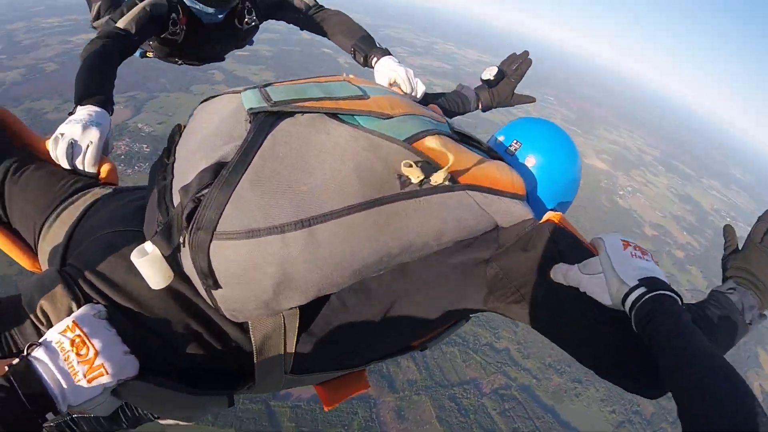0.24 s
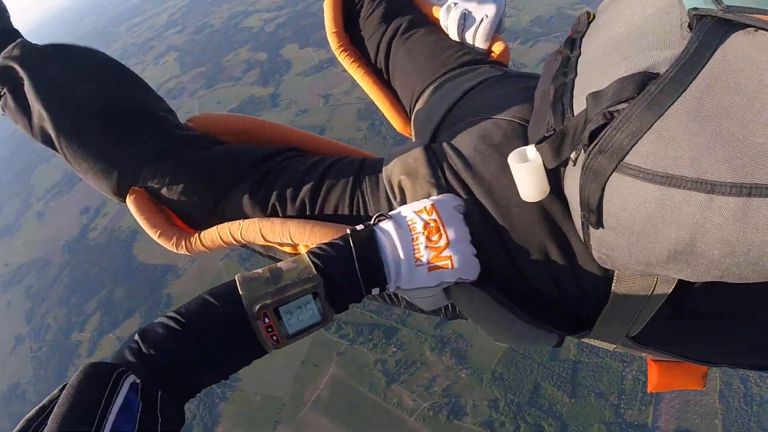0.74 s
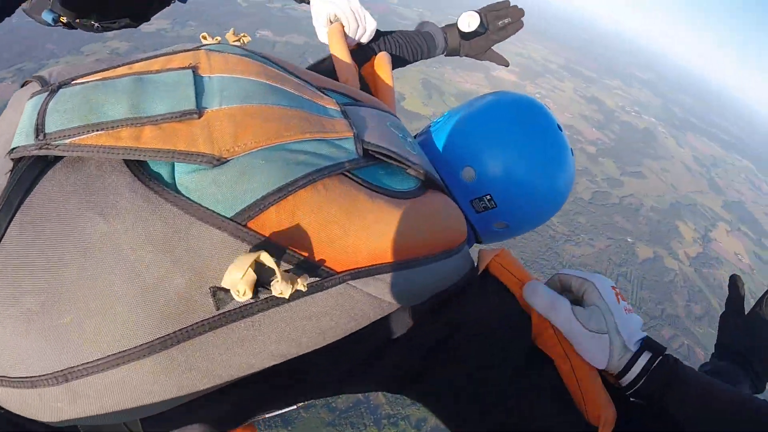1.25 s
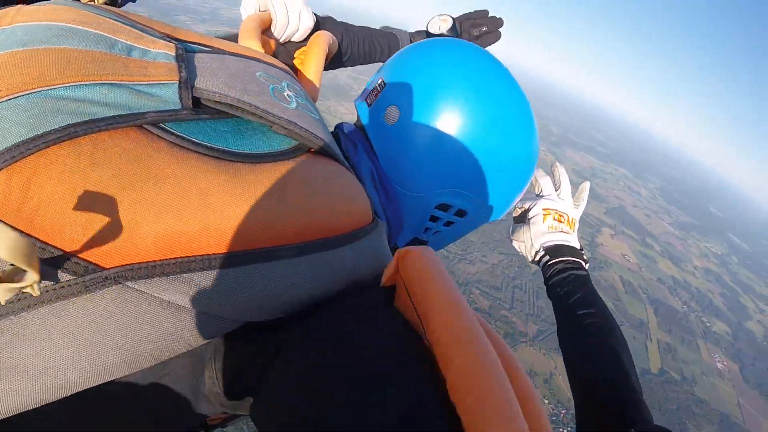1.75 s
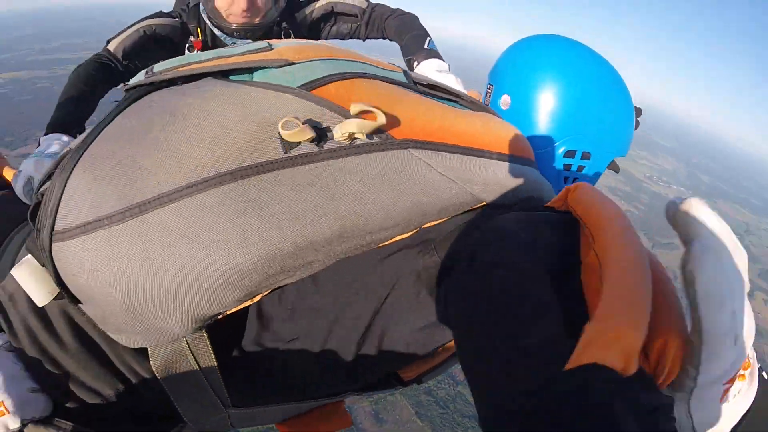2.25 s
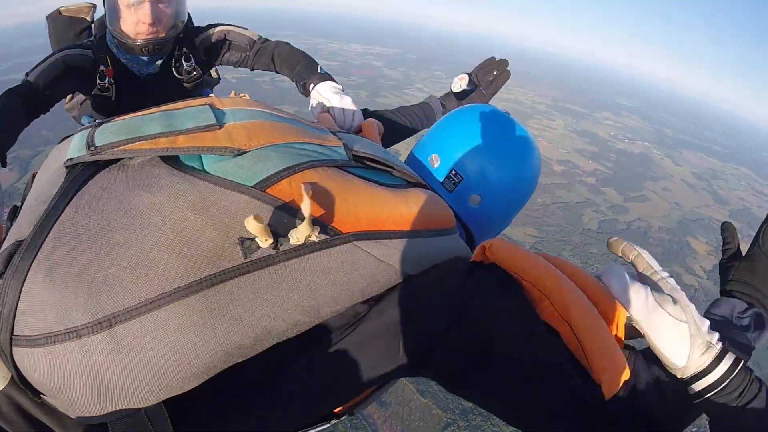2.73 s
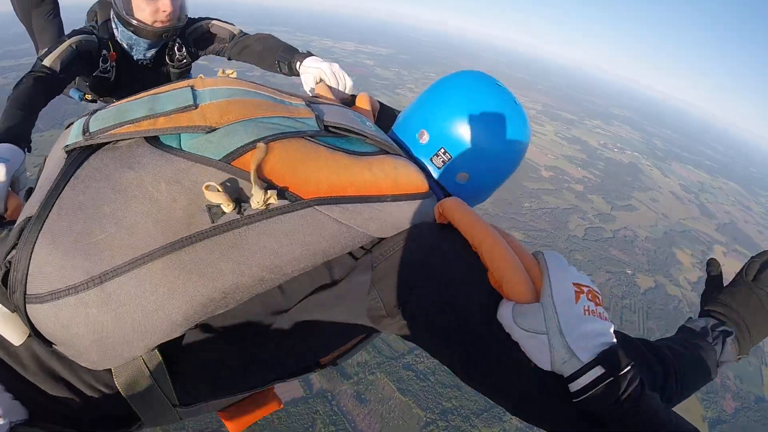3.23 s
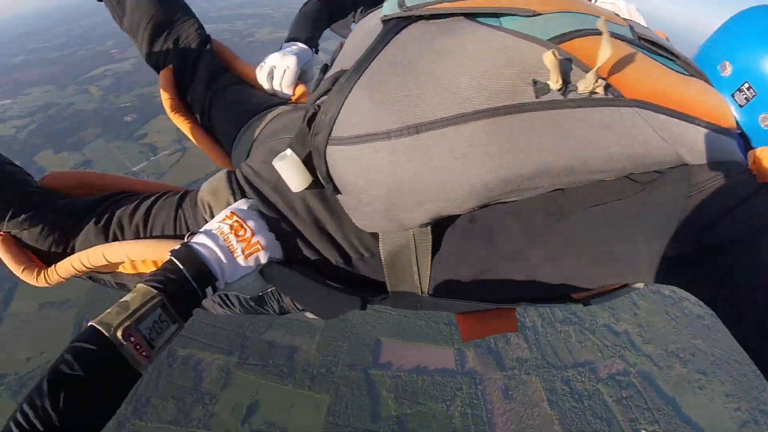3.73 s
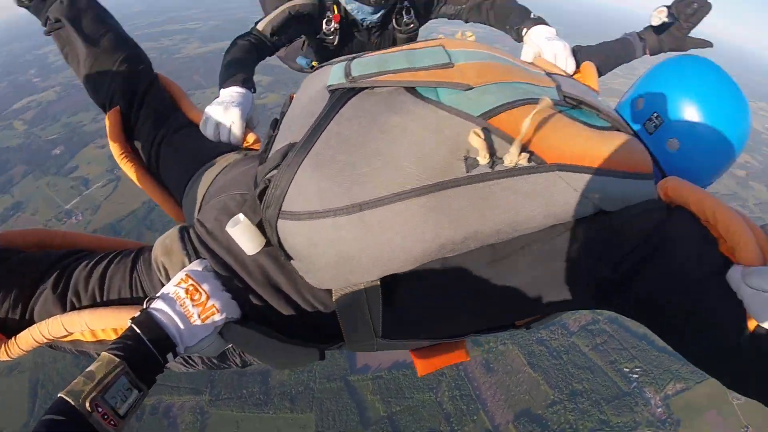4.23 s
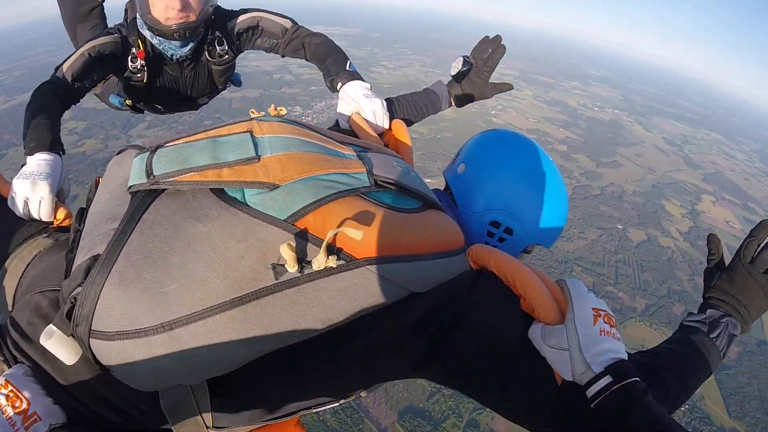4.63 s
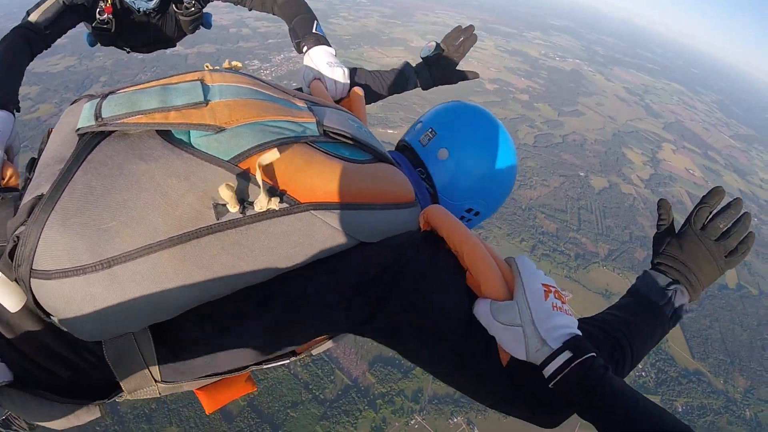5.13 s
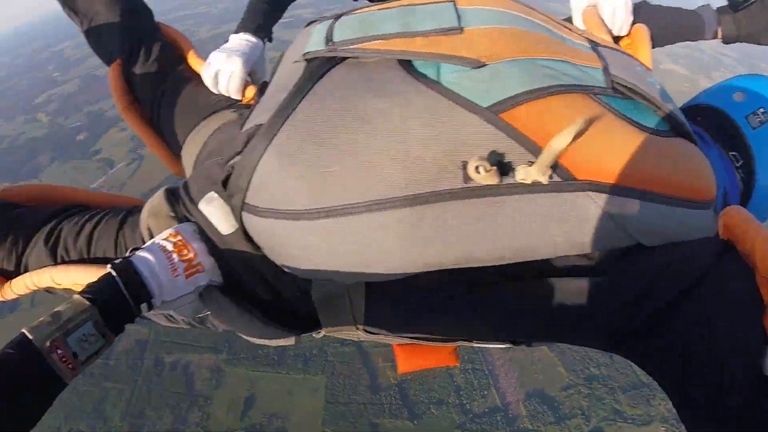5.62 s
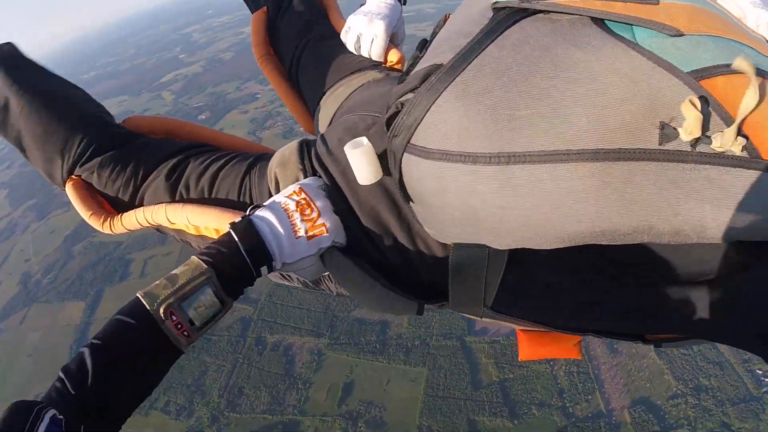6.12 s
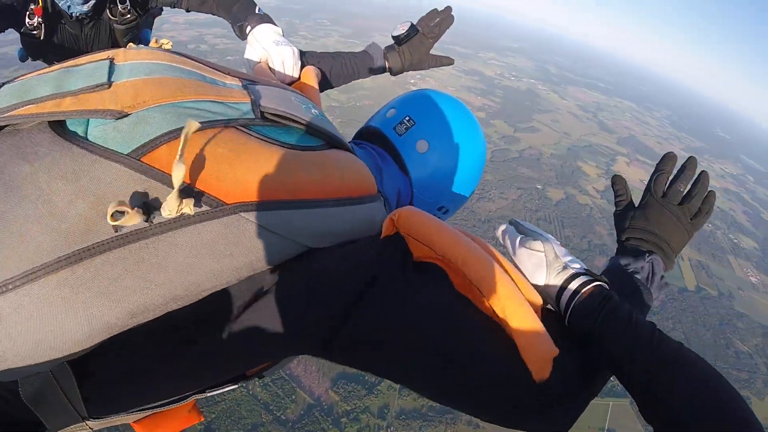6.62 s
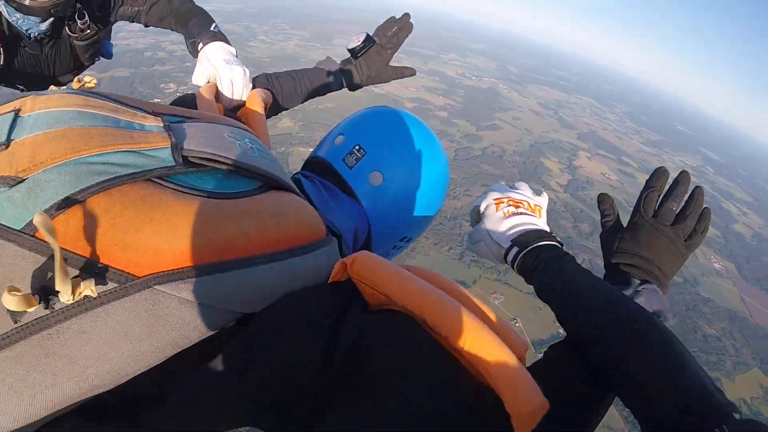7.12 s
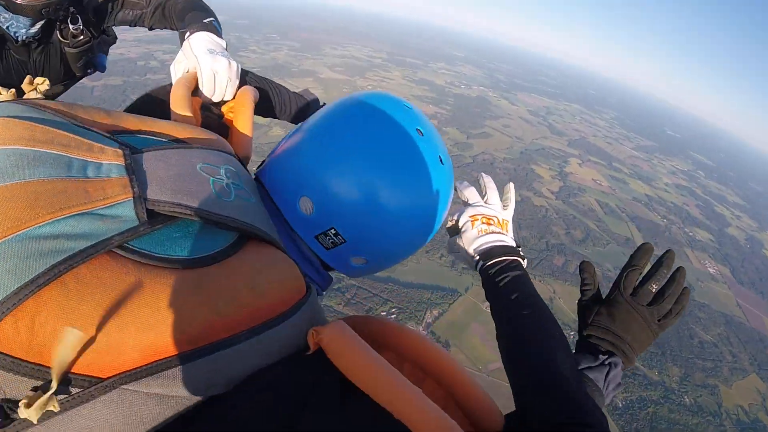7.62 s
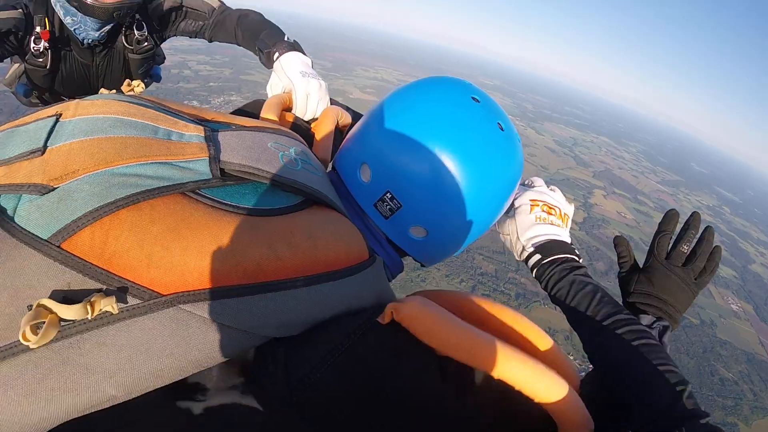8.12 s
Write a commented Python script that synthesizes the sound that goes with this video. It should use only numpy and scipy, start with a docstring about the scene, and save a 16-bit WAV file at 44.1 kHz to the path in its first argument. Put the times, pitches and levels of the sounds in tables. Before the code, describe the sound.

Skydivers in freefall, heard from a helmet camera whose microphone is overwhelmed by wind. A deep rumble and low throb run constantly under a ragged roar. The first second is brightest and harshest, with hissing bursts and hard slaps; then the hiss dulls and the air flutters, swelling brighter again around four and six seconds before ending darker and choppy. Very close, mono, squashed by limiting.

```python
"""A torn, buffeting wind roar with sharp slaps and a fluttering hiss: freefall, at a helmet camera's microphone port.
Large eddies buffet the housing and a wake sheds near 65 Hz: noise bands on slow level curves.
Small eddies roar and hiss in the port's cavity: higher bands that flutter together and follow head turns.
Bursts are short swells of noise, slaps are short damped tones; the camera's limiter holds the peaks down."""
import sys
import numpy as np
from scipy import signal
from scipy.fft import rfft, irfft, dct, next_fast_len
from scipy.io import wavfile
from scipy.ndimage import uniform_filter1d, minimum_filter1d, map_coordinates

SR = 44100
rng = np.random.default_rng(int(sys.argv[2]) if len(sys.argv) > 2 else 0)


def transcribe(signal):
    """Save signal, clipped to [-1, 1], as a 16-bit WAV file at the path in sys.argv[1]."""
    frames = np.atleast_2d(signal).T
    limited = np.clip(frames, -1, 1)
    pcm = np.round(limited * 32767).astype(np.int16)
    wavfile.write(sys.argv[1], SR, pcm)


N = 368676

# Levels in the tables are base levels: flutter, gulps and the recorder act on top.
# Flow at the port as the head turns. Each row: time in seconds, hiss, rush, roar and eddy levels in dB.
PORT_FLOW = [(0, -33.5, -27, -22.5, -14.5), (.3, -40.5, -31.5, -25, -24.5), (.45, -31, -29.5, -26, -16),
             (.62, -31.5, -30, -27.5, -16), (.83, -28.5, -27, -23, -13.5), (1.0, -34, -28, -26.5, -18),
             (1.155, -35.5, -30.5, -25, -22), (1.163, -47, -31, -24, -14), (1.2, -38, -28.5, -24.5, -17.5),
             (1.5, -43.5, -36.5, -28.5, -24), (1.75, -44, -34.5, -25, -23), (1.9, -43.5, -38, -28.5, -20),
             (2.04, -49, -43, -27.5, -16), (2.17, -41.5, -32.5, -28, -22), (2.3, -36, -30, -22, -21),
             (2.39, -48, -42, -33, -26), (2.62, -54, -47.5, -39.5, -31.5), (3.45, -49.5, -45, -32, -28.5),
             (3.64, -41.5, -32, -29.5, -21.5), (3.72, -38, -34, -34.5, -23.5),
             (4.05, -37.5, -35, -33.5, -19), (4.27, -36, -30.5, -25.5, -14), (4.325, -41.5, -30.5, -30, -9),
             (4.338, -45, -32.5, -23.5, -12.5), (4.41, -49, -32.5, -25, -13.5), (4.43, -47, -42, -24, -15),
             (4.48, -44.5, -38.5, -29.5, -17), (4.6, -48, -40.5, -34.5, -24),
             (4.9, -41, -31.5, -23.5, -20.5), (5.15, -45, -37, -32, -27.5), (5.4, -45.5, -40, -31.5, -26),
             (5.5, -44.5, -33, -28, -21.5), (5.62, -40.5, -34, -28.5, -27), (5.75, -37, -35, -32, -24.5),
             (6.1, -38, -32.5, -30.5, -18.5), (6.35, -34, -29.5, -24.5, -20),
             (6.45, -43.5, -31.5, -26, -18.5), (6.64, -40.5, -34.5, -30, -30.5),
             (6.7, -47.5, -40, -29.5, -28.5), (7.1, -52.5, -45, -34.5, -30.5),
             (7.55, -55, -48.5, -40, -27.5), (7.9, -45.5, -39.5, -30.5, -19.5),
             (8.1, -46.5, -39.5, -30.5, -24), (8.36, -50.5, -46.5, -34.5, -30)]
# Slow pressure on the housing. Each row: time in seconds, rumble, wake and throb levels in dB.
HOUSING_PRESSURE = [(0, -14.5, -14.5, -18), (.6, -12.5, -20.5, -18), (1.2, -10.5, -12, -18),
                    (1.5, -22.5, -14, -18), (1.85, -15, -11, -14.5), (2.4, -15.5, -15.5, -18),
                    (3.2, -16, -12, -20), (3.7, -17, -15.5, -15), (4.0, -17, -25, -20.5),
                    (4.15, -20.5, -12.5, -12.5), (4.45, -16, -14.5, -18.5), (5.0, -16, -12.5, -18.5),
                    (5.7, -14, -16.5, -16.5), (6.05, -14, -20, -20), (6.5, -14, -10, -21.5),
                    (6.6, -8.5, -16, -22.5), (6.66, -25, -17.5, -26.5), (6.8, -15, -13.5, -21),
                    (7.3, -16.5, -12.5, -25.5), (7.8, -11.5, -16, -17.5), (8.36, -20.5, -12, -23)]
# Wake locking into a drone. Each row: time in seconds, locked share of wake power (0-1).
WAKE_LOCK = [(0, 0.04), (2.3, 0), (2.6, 0.79), (3.4, 0), (3.6, 0.12), (6.5, 0), (6.75, 0.95), (7.45, 0.2),
             (7.7, .05), (8.1, 0.03), (8.36, 0.5)]
# Quick eddies among the eddies. Each row: time in seconds, their share of power (0-1).
QUICK_SHARE = [(0, .6), (.3, 0.42), (.7, 0.4), (1.1, 0.47), (1.4, 0.2), (1.9, 0.4), (2.3, 0), (2.7, 0.06),
               (3.4, 0.2), (3.9, 0.27), (4.3, .3), (4.8, 0.17), (5.3, .2), (5.9, .1), (6.4, 0.37),
               (7.0, .3), (7.6, 0.31), (8.0, 0), (8.36, 0)]
# Upper rush over what the hiss gives it. Each row: time in seconds, level in dB.
TEAR_EXTRA = [(0, 2), (.4, 0), (1.1, -0.5), (1.4, 0.5), (2.3, -1), (3.4, 0), (3.7, 2), (4.3, 3), (4.6, -2),
              (5.5, 0), (5.9, 1), (6.4, 2.5), (6.7, 2), (7.2, 1.5), (8.36, -1)]
# The rush loses its top as a gust lets go. Each row: time in seconds, upper edge in Hz.
RUSH_EDGE = [(0, 7000), (4.33, 7000), (4.338, 2200), (4.41, 1590), (4.425, 7000), (6.65, 7000),
             (6.66, 2000), (6.705, 1600), (6.715, 7000), (8.36, 7000)]
# Gulps of air and brief lulls. Each row: centre in seconds, lift in dB, width at half height in seconds.
GULPS_AND_LULLS = [(0.045, -8, 0.015), (0.128, -9.5, 0.045), (0.145, 8, 0.016), (0.306, 1, 0.0093),
                   (0.562, 1, 0.02), (0.59, -2, 0.018), (0.68, 2.5, 0.14), (0.852, -1, 0.017),
                   (0.983, 2.5, 0.015), (1.378, 3.5, 0.014), (1.734, 4, 0.01), (1.78, 0, 0.016),
                   (2.175, 6.5, 0.013), (2.375, -8, 0.011), (2.416, 5, 0.059), (2.447, -16, 0.012),
                   (2.507, 5, 0.016), (2.644, -3, 0.016), (2.709, 14, 0.048), (2.818, -4.5, 0.04),
                   (2.771, 4.5, 0.018), (2.89, 4.5, 0.04), (2.943, 12.5, 0.028), (2.981, 11.5, 0.023),
                   (3.015, 2.5, 0.03), (3.044, 9.5, 0.01), (3.064, 5.5, 0.014), (3.1, -13, 0.021),
                   (3.175, 8.5, 0.025), (3.201, -12, 0.027), (3.238, 7, 0.012), (3.279, 10.5, 0.01),
                   (3.33, 7, 0.017), (3.36, 8, 0.018), (3.523, 6, 0.064), (3.582, 5.5, 0.02),
                   (3.605, -16, 0.016), (3.64, -10, 0.02), (4.382, -6, 0.012), (4.414, -4, 0.016),
                   (4.466, -2, 0.011), (4.515, 8, 0.018), (4.535, -6.5, 0.017), (4.558, 5, 0.016),
                   (4.583, -9, 0.016), (4.605, 8, 0.011), (4.622, -9, 0.016), (4.631, 4, 0.01),
                   (4.658, 6, 0.011), (4.768, 3.5, 0.012), (4.846, 1, 0.021), (5.037, 8, 0.006),
                   (5.185, 6.5, 0.024), (5.255, 2.5, 0.056), (5.31, 2.5, 0.022), (5.36, 2, 0.0091),
                   (6.587, 5, 0.034), (6.63, 0.5, 0.025), (6.665, -1.5, 0.025), (6.718, 1.5, 0.02),
                   (6.74, -8, 0.02), (6.758, 5.5, 0.016), (6.792, -10, 0.012), (6.881, 5, 0.038),
                   (6.913, -4, 0.015), (6.958, 3, 0.04), (7.005, 6.5, 0.015), (7.023, -11, 0.018),
                   (7.062, 7.5, 0.014), (7.082, -9, 0.017), (7.096, 5.5, 0.02), (7.132, -5, 0.023),
                   (7.184, 10, 0.054), (7.22, 4, 0.01), (7.286, 12, 0.032), (7.315, -6, 0.025),
                   (7.346, 2, 0.019), (7.384, 11, 0.0092), (7.494, 8.5, 0.025), (7.516, -17, 0.019),
                   (7.532, 7, 0.01), (7.59, 7, 0.016), (7.685, 6, 0.023), (7.706, -10, 0.012),
                   (7.797, -8, 0.01), (7.819, 6.5, 0.018), (7.744, 2.5, 0.044), (7.89, 3, 0.019),
                   (7.922, 2.5, 0.011), (8.012, 8, 0.024), (8.056, 13.5, 0.0069), (8.077, 4.5, 0.012),
                   (8.166, 7, 0.03), (8.2, -0.5, 0.018), (8.224, 6, 0.016), (8.258, 3.5, 0.024),
                   (8.334, 2, 0.011)]
# Bursts in the port, strong and faint. Each row: start in seconds, peak of the swell in dB.
PORT_BURSTS = [(0.025, -25), (0.162, -24.5), (0.255, -29), (0.487, -35), (0.526, -29), (0.54, -20),
               (0.556, -32), (0.724, -36), (0.761, -25), (0.8, -19), (0.948, -32), (0.959, -27),
               (0.967, -18), (0.981, -22), (1.07, -25), (1.148, -28.5), (2.176, -45), (2.238, -29),
               (2.277, -31), (3.581, -38), (3.658, -33), (3.71, -33), (3.745, -34), (3.882, -36),
               (3.916, -30), (3.953, -26), (3.995, -35), (4.111, -30), (4.19, -27), (4.222, -33),
               (4.5995, -45), (5.287, -34), (5.47, -39), (5.771, -37), (5.934, -37), (5.968, -28.5),
               (6.004, -30), (6.064, -25.5), (6.127, -25.5), (6.234, -29.5), (6.317, -37), (6.585, -28),
               (7.817, -36.5), (8.0531, -34.5)]
# Slaps on the housing, strong and faint. Each row: start in seconds, peak of the tone in dB, pitch in Hz.
HOUSING_SLAPS = [(0.231, -9, 176), (0.426, -13, 205), (0.504, -6.5, 210), (0.583, -2, 210),
                 (0.735, -2.5, 190), (0.783, -9.5, 195), (0.96, -9, 314), (1.058, -9, 213),
                 (1.246, -14, 195), (1.334, -6, 169), (1.733, -11, 390), (1.778, -17, 607),
                 (1.896, -14, 377), (1.931, -11.5, 457), (1.955, -6.5, 177), (2.002, -11, 406),
                 (2.248, -8, 280), (2.353, -13.5, 453), (2.426, -13, 254), (2.625, -20, 363),
                 (2.673, -21, 436), (2.722, -19, 304), (2.837, -20, 318), (2.936, -30, 378),
                 (2.985, -18, 466), (3.152, -28, 363), (3.225, -15, 367), (3.327, -8.5, 392),
                 (3.36, -16, 490), (3.491, -17, 318), (3.507, -11, 470), (3.529, -10.5, 318),
                 (3.935, -13, 212), (4.177, -10, 200), (4.279, -10, 364), (4.361, -4, 193),
                 (4.384, -11.5, 308), (4.598, -14, 304), (4.655, -14, 303), (4.701, -16, 448),
                 (4.731, -10.5, 205), (4.767, -18, 480), (5.046, -13, 390), (5.29, -11, 410),
                 (5.764, -13, 174), (6.253, -15.5, 318), (6.394, -12.5, 186), (6.416, -9, 209),
                 (6.948, -15.5, 159), (6.99, -23, 487), (7.191, -23, 445), (7.281, -19.5, 575),
                 (7.375, -16.5, 310), (7.467, -16.5, 167), (7.495, -20, 424), (7.779, -16, 176),
                 (7.816, -11.5, 181), (7.854, -15, 376), (7.916, -12.5, 527), (8.01, -23, 446),
                 (8.052, -17, 320), (8.156, -22, 301), (8.22, -20.5, 490)]

# Noise spectra, all scaled to rms 1. Each row: frequency in Hz, relative density in dB per Hz.
# Air streaming over suits and rig.
STREAM_SPECTRUM = [(250, -29), (400, 0), (1000, -16), (1700, -24.5), (2500, -37), (3500, -33.5),
                   (4800, -42), (6600, -26.5), (9000, -37), (12000, -72)]
# Slow layers, lowest first; the wake both loose and locked in step.
RUMBLE_SPECTRUM = [(4, -35.5), (12, -19.5), (22, 5), (30, -1), (40, 5.5), (60, -10), (100, -40.5)]
WAKE_SPECTRUM = [(30, -37), (48, -3.5), (63, -1), (85, -0.5), (130, -27)]
DRONE_SPECTRUM = [(45, -34.5), (55, -1), (63, 8.5), (71, -2.5), (84, -33)]
THROB_SPECTRUM = [(55, -36), (90, -5), (115, 0), (140, -5), (200, -41.5), (300, -58.5)]
# Eddies: ordinary, smaller and quicker, small and fast in full flow.
EDDY_SPECTRUM = [(90, -33.5), (150, 1.5), (200, 2), (300, -4), (420, -15), (800, -56.5)]
QUICK_SPECTRUM = [(130, -33.5), (210, -1.5), (270, 1), (340, -0.5), (450, -12.5), (800, -50)]
BODY_SPECTRUM = [(200, -21.5), (290, 4), (350, 1.5), (430, -6), (600, -26.5)]
# Roar, rush, and the upper rush of full flow.
ROAR_SPECTRUM = [(200, -30.5), (400, 2), (500, 0.5), (750, -2.5), (1100, -10.5), (1800, -27)]
RUSH_SPECTRUM = [(500, -42.5), (900, -0.5), (1200, 1), (1700, -2), (2200, -10), (3000, -24), (4200, -46.5)]
TEAR_SPECTRUM = [(1000, -33.5), (1700, 0.5), (2400, 0), (3200, -6), (4200, -18), (5500, -40)]
# Hiss, with a port cavity peak near 6.6 kHz.
HISS_SPECTRUM = [(1000, -44.5), (1900, -3), (2500, -3), (3300, -7), (4100, -11.5), (4800, -16.5),
                 (5400, -12.5), (6000, -7.5), (6600, -6), (7200, -7), (7900, -12.5), (9000, -20),
                 (11000, -30), (13000, -41.5), (15500, -60.5)]
# Port cavity ringing in a burst.
CAVITY_SPECTRUM = [(1000, -31), (2000, -10), (3300, -6), (4800, -13.5), (6600, -1.5), (9000, -18),
                   (12000, -34.5), (15500, -56)]

HEAVE_DB, HEAVE_PER_S = 2, 8  # random swell of rumble and throb
DRIFT_DB, DRIFT_PER_S = 0.24, 9.2  # random drift of the flow
LULL_LIMIT_DB = 8  # deepest lull, before each band's weight
LEE_MIN, LEE_MAX = 0.3, 1.2  # bounds of the flutter factor in the lee
SPIT_DB = 2  # crackle, per unit of curve above its threshold
BURST_RISE_S = 0.0035
GULP_STEEPNESS = 2  # 2 is a plain bell
FULL_FLOW_HISS_DB = -37  # hiss level at which the next two levels hold
TEAR_DB, TEAR_DB_PER_HISS_DB = -41.5, 1.05
BODY_DB, BODY_DB_PER_HISS_DB = -32, 1.08
TOP_HZ = 15700


def amp(db):
    """Amplitude ratio of a level in dB."""
    return 10 ** (np.asarray(db) / 20)


def unit(x):
    """x scaled to rms 1."""
    return x / np.sqrt(np.mean(x ** 2) + 1e-20)


def curves(rows):
    """One value per sample for each column after the time."""
    time_s, *columns = np.transpose(rows)
    return [np.interp(np.arange(N) / SR, time_s, column) for column in columns]


def wobble(knots_per_s):
    """A smooth random curve through normally distributed knots."""
    knots = rng.standard_normal(int(N * knots_per_s / SR) + 4)
    return map_coordinates(knots, [np.arange(N) * knots_per_s / SR])


def filtered(x, response):
    """x times a response of frequency."""
    size = next_fast_len(N + 8192)
    return irfft(rfft(x, size) * response(np.fft.rfftfreq(size, 1 / SR)), size)[..., :N]


def noise(spectrum):
    """Noise of rms 1, its spectrum interpolated on a log frequency axis."""
    point_hz, point_db = np.transpose(spectrum)

    def colour(hz):
        return amp(np.interp(np.log(hz + 1), np.log(point_hz + 1), point_db, left=-120, right=-120))

    return unit(filtered(rng.standard_normal(N), colour))


def swept(spectrum, flutter_db):
    """Noise whose level flutters, brought back to rms 1."""
    return unit(amp(flutter_db) * noise(spectrum))


def mixed(first, second, share):
    """Two signals crossfaded at constant power; share is that of the second."""
    share = np.clip(share, 0, 1)
    return np.sqrt(1 - share) * first + np.sqrt(share) * second


def dulled(x, edge, order=16):
    """x under a low-pass whose corner follows the edge table."""
    hz, time_s, bins = signal.stft(x, SR, nperseg=256)
    corner_hz = np.interp(time_s, *np.transpose(edge))
    gain = 1 / np.sqrt(1 + (hz[:, None] / corner_hz) ** order)
    return signal.istft(bins * gain, SR, nperseg=256)[1][:N]


def stream():
    """Air over suits and rig nearby never lets up: steady noise."""
    return amp(-41.5) * noise(STREAM_SPECTRUM)


def shedding(steadiness=0.45):
    """Vortices leave the helmet with rather even strength; facing sideways they lock into a drone."""
    wake = mixed(noise(WAKE_SPECTRUM), noise(DRONE_SPECTRUM), curves(WAKE_LOCK)[0])
    pad = SR // 10
    padded = np.pad(wake, pad, "reflect", reflect_type="odd")
    envelope = np.abs(signal.hilbert(padded, next_fast_len(len(padded)))[pad:pad + N])
    # dividing by part of the envelope evens the strength
    return unit(wake / (envelope + 0.38) ** steadiness)


def housing_swing():
    """Large eddies press slowly on the housing: rumble, wake and throb."""
    rumble_db, wake_db, throb_db = curves(HOUSING_PRESSURE)
    rumble = amp(rumble_db) * swept(RUMBLE_SPECTRUM, HEAVE_DB * wobble(HEAVE_PER_S))
    throb = amp(throb_db) * swept(THROB_SPECTRUM, HEAVE_DB * wobble(HEAVE_PER_S))
    return rumble + amp(wake_db) * shedding() + throb


def bursts():
    """Single eddies burst in the port: short swells of cavity ringing and rush."""
    kicks = np.zeros(N)
    for start_s, db in PORT_BURSTS:
        kicks[round(start_s * SR)] = amp(db)
    u = np.arange(SR // 20) / SR / BURST_RISE_S
    swell = signal.fftconvolve(kicks, (u * np.exp(1 - u)) ** 2)[:N]
    colour = 0.62 * noise(CAVITY_SPECTRUM) + 0.48 * noise(RUSH_SPECTRUM) + 0.35 * noise(TEAR_SPECTRUM)
    return swell * colour


def slaps(rise_cycles=0.68, roughness=0.2):
    """Crisp pressure slaps on the housing: short damped tones of either sign, roughened by roar."""
    tone, swell = np.zeros(N + SR), np.zeros(N + SR)
    t = np.arange(SR // 20) / SR
    signs = rng.choice([-1, 1], len(HOUSING_SLAPS))
    for (start_s, db, hz), sign in zip(HOUSING_SLAPS, signs):
        u = t * hz / rise_cycles
        bump = amp(db) * u * np.exp(1 - u)
        span = slice(round(start_s * SR), round(start_s * SR) + len(t))
        # the cosine crests where the bump peaks
        tone[span] += sign * bump * np.cos(2 * np.pi * (hz * t - rise_cycles))
        swell[span] += bump
    return tone[:N] + roughness * swell[:N] * noise(ROAR_SPECTRUM)


def gulps():
    """Gulps raise and lulls lower the flow at the port: bells in dB."""
    t = np.arange(N) / SR
    lift_db = np.zeros(N)
    for centre_s, db, width_s in GULPS_AND_LULLS:
        lift_db += db * np.exp(-np.log(16) * np.abs((t - centre_s) / width_s) ** GULP_STEEPNESS)
    return lift_db


def port_lift():
    """Gulps and drift in dB; lulls saturate, so they never empty the port completely."""
    lift_db = gulps() + DRIFT_DB * wobble(DRIFT_PER_S)
    return np.where(lift_db < 0, LULL_LIMIT_DB * np.tanh(lift_db / LULL_LIMIT_DB), lift_db)


def eddies(eddy_db, lift_db, bunches):
    """Eddies of two sizes pass the port: two noise bands sharing one flutter."""
    sizes = mixed(noise(EDDY_SPECTRUM), noise(QUICK_SPECTRUM), curves(QUICK_SHARE)[0])
    fluttering = unit(amp(0.28 * bunches + 1.38 * wobble(40)) * sizes)
    return amp(eddy_db + 0.67 * lift_db + 1.47 * wobble(12)) * fluttering


def port_wind(swing):
    """Small eddies roar and hiss in the port: bands share flutter; roar and rush follow falling pressure most."""
    hiss_db, rush_db, roar_db, eddy_db = curves(PORT_FLOW)
    lift_db = port_lift()
    falling = -unit(np.gradient(swing))
    # full flow is an even rush; in the lee of the helmet it flutters more
    lee = np.clip(1 - 0.084 * (rush_db + 37.5), LEE_MIN, LEE_MAX)
    bunches = lee * (0.5 * wobble(35) + 1.3 * wobble(70))
    fine = wobble(220)
    # now and then a tiny eddy spits for a millisecond or two
    spits = SPIT_DB * np.maximum(wobble(400) - 1.3, 0)

    roar_flutter = 0.82 * bunches + lee * (1.0 * falling + 1.0 * fine + 0.67 * wobble(50))
    roar = amp(roar_db + 0.82 * lift_db + 0.44 * wobble(15)) * swept(ROAR_SPECTRUM, roar_flutter)

    rush_flutter = 0.54 * bunches + lee * (1.2 * falling + 2.05 * fine + 0.69 * wobble(90))
    rush = amp(rush_db + 0.99 * lift_db) * swept(RUSH_SPECTRUM, rush_flutter)

    hiss_flutter = 1.3 * bunches + 0.19 * falling + 1.6 * fine + 2.2 * wobble(600) + spits
    hiss = amp(hiss_db + 0.91 * lift_db + 0.69 * wobble(16)) * swept(HISS_SPECTRUM, hiss_flutter)

    # full flow fills the gaps between these bands
    full_db = hiss_db - FULL_FLOW_HISS_DB
    tear_db = TEAR_DB + TEAR_DB_PER_HISS_DB * full_db + curves(TEAR_EXTRA)[0] + 0.84 * lift_db
    tear = amp(tear_db) * swept(TEAR_SPECTRUM, 0.8 * bunches + 1.2 * fine + 0.6 * spits)
    body = amp(BODY_DB + BODY_DB_PER_HISS_DB * full_db) * swept(BODY_SPECTRUM, 0.64 * bunches)

    return eddies(eddy_db, lift_db, bunches) + roar + dulled(rush + tear, RUSH_EDGE) + hiss + body


def scene():
    """All layers summed to one channel."""
    swing = housing_swing()
    return (stream() + swing + bursts() + slaps() + port_wind(swing))[None]


def limited(x, top_db, hold_s, glide_s):
    """Gain dips around each loud peak, smoothed over the glide; sudden peaks partly slip through."""
    needed = np.minimum(1, amp(top_db) / (np.abs(x) + 1e-9))
    held = minimum_filter1d(needed, int(hold_s * SR), axis=-1)
    return x * uniform_filter1d(held, int(glide_s * SR), axis=-1)


def record(dry):
    """Limiter, a soft ceiling, and the camera's band limit."""
    x = limited(amp(0.2) * dry, top_db=-3.0, hold_s=0.015, glide_s=0.048)
    x = x / (1 + np.abs(x / 0.93) ** 8) ** (1 / 8)
    kept = np.arange(N) * SR / (2 * N) < TOP_HZ
    return dct(dct(x, norm="ortho") * kept, type=3, norm="ortho")


dry = scene()
out = record(dry)
transcribe(out)
```